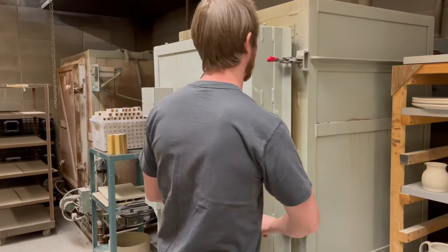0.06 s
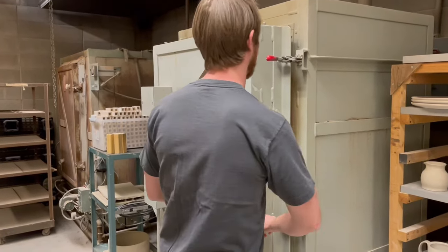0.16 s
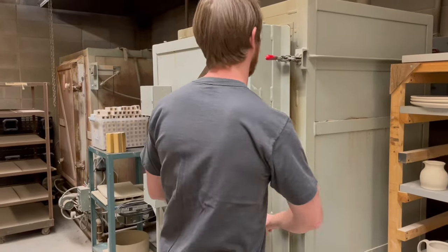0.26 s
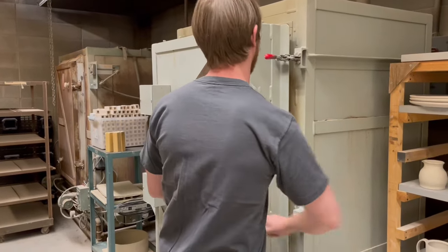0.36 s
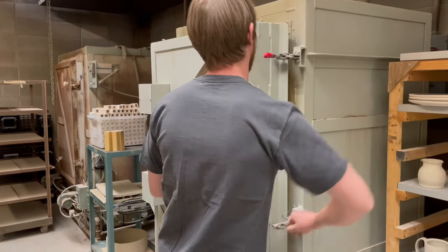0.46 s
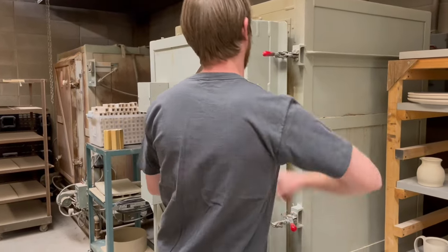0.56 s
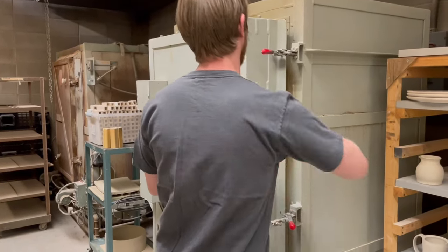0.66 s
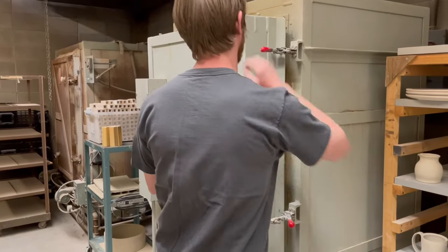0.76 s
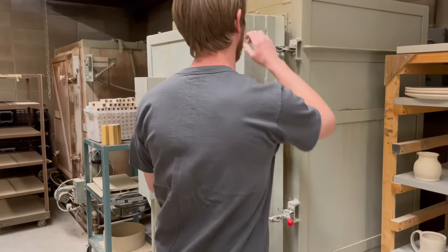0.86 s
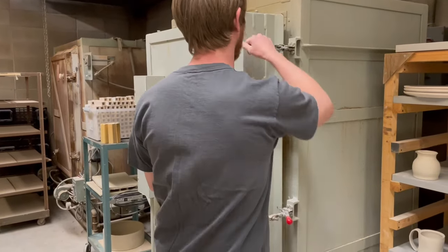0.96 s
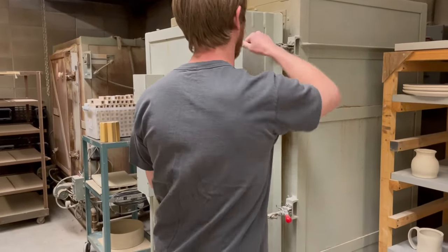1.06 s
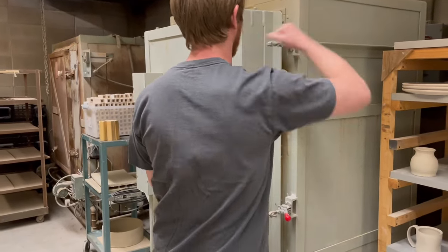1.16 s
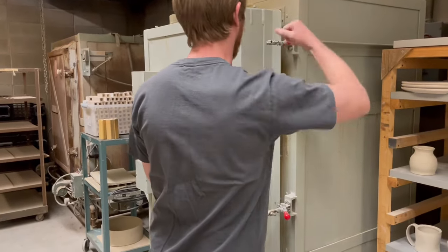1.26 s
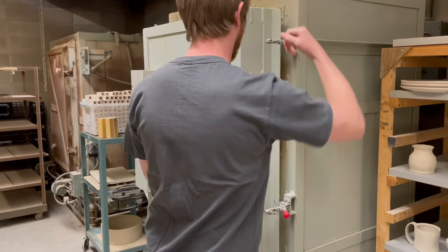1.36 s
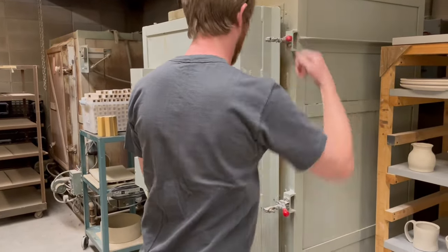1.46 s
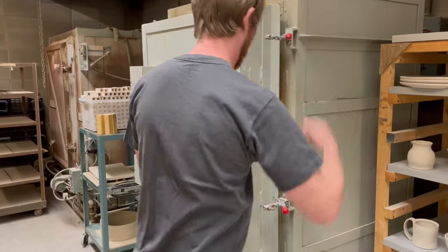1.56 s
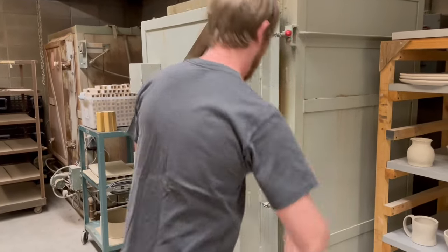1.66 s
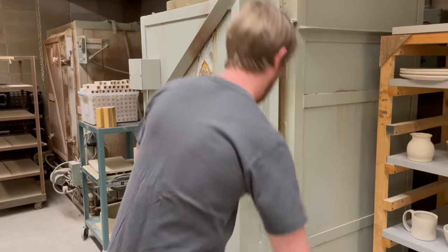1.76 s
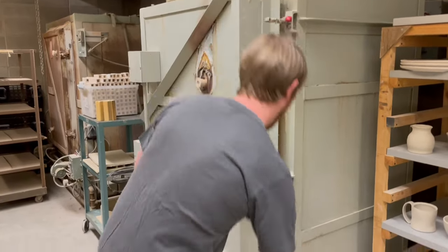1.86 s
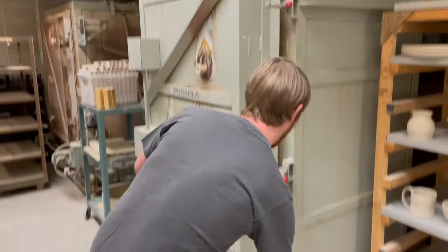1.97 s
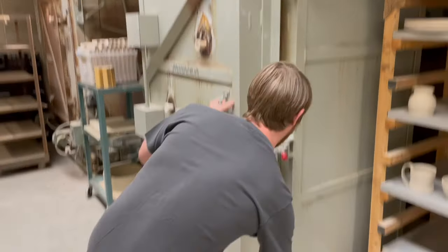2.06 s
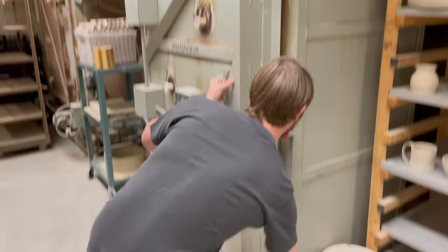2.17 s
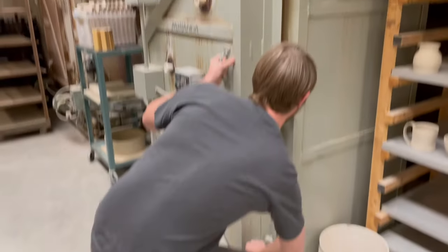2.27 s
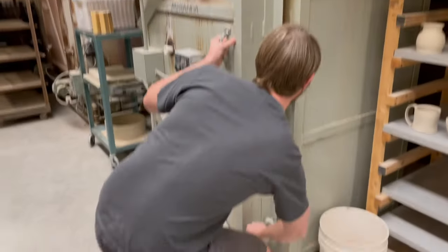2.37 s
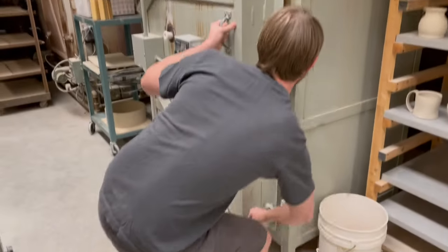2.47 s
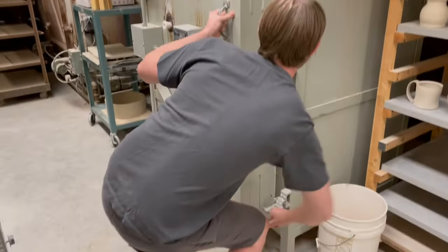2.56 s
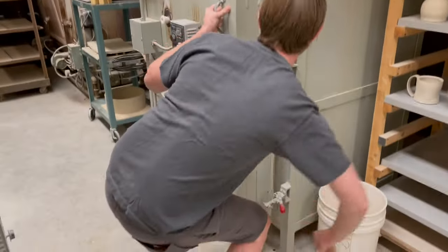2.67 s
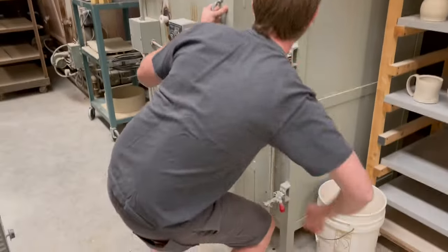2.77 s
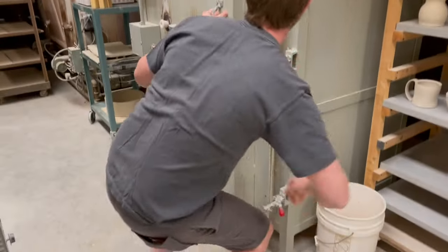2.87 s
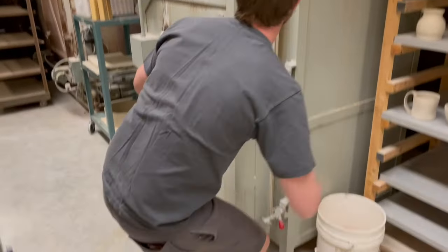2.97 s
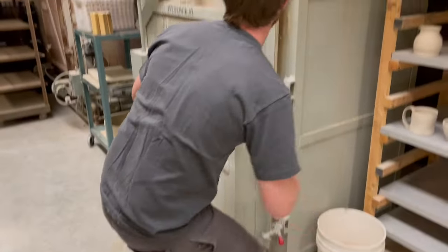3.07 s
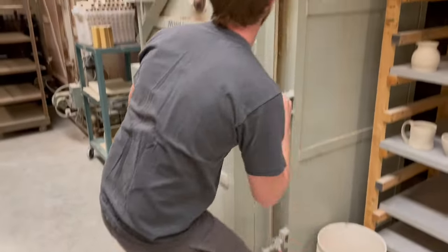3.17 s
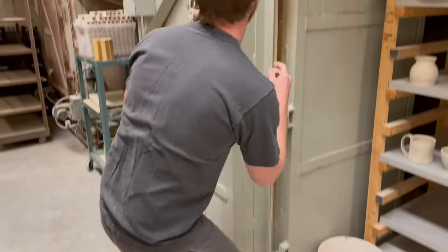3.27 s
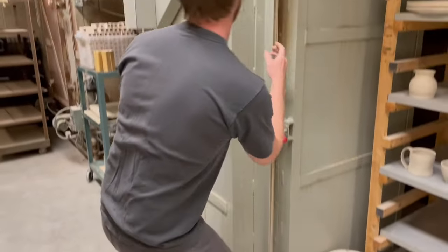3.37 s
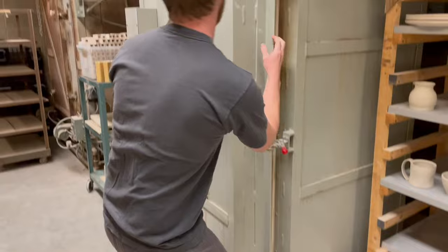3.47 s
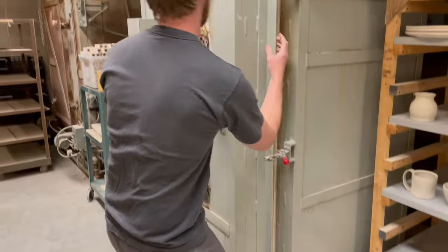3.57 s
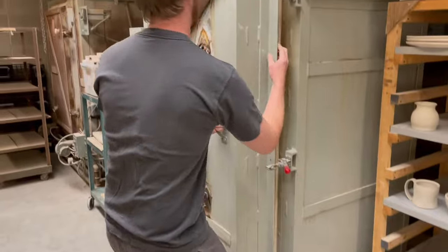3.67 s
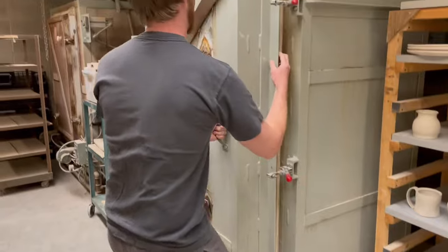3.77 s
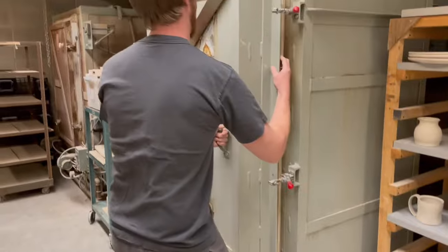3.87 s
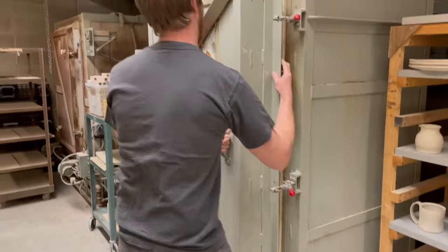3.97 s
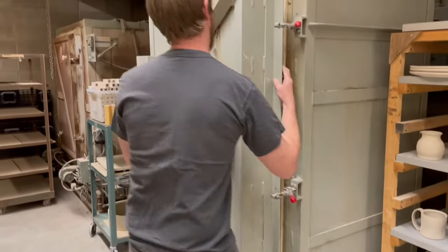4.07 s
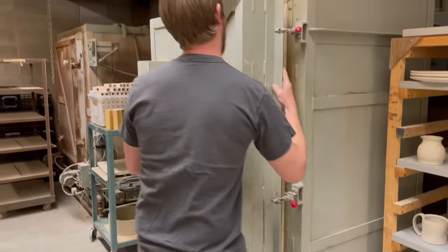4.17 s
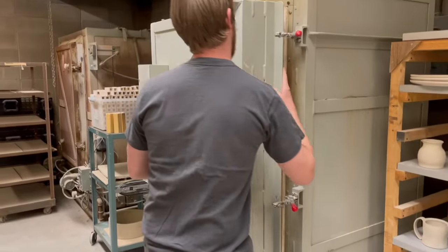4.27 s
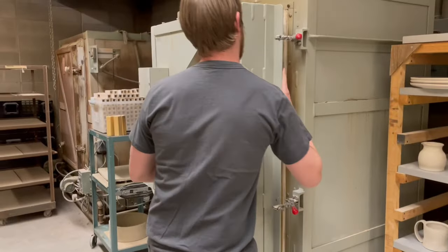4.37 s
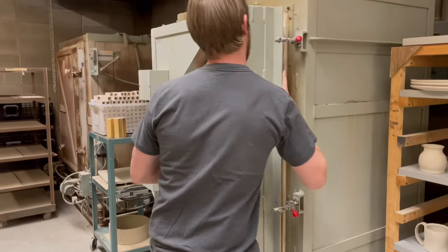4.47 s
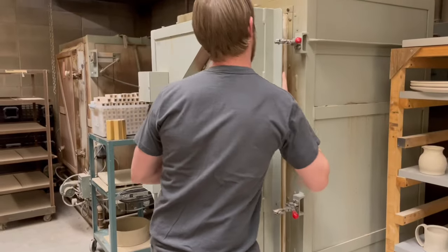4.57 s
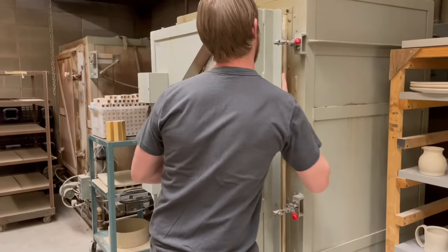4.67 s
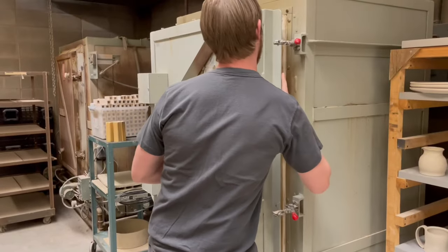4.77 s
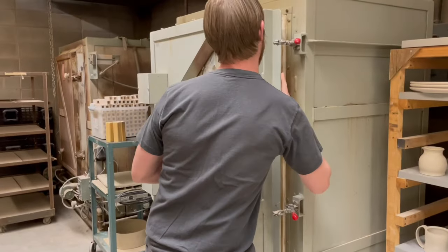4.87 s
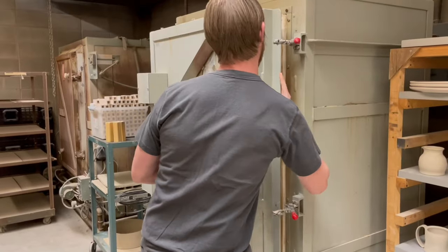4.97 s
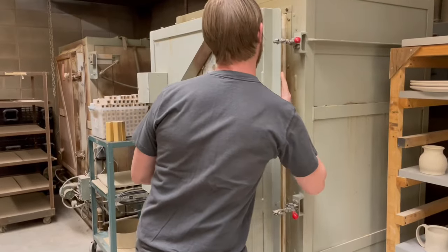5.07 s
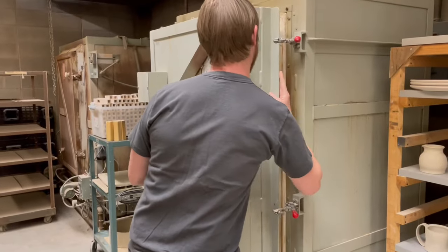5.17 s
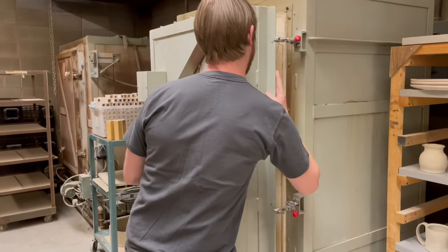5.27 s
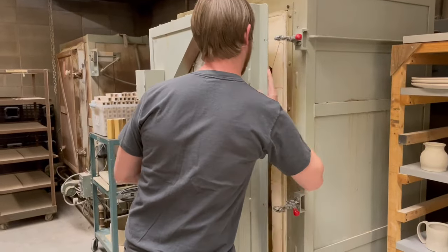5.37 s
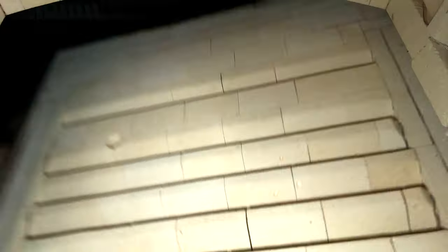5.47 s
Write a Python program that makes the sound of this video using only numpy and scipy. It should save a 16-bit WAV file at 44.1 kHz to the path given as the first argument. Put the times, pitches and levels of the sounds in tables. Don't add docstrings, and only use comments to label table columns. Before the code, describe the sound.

Three steel latches on a heavy metal door slam open with booming, echoing clacks, then the door ticks, scrapes and creaks as it is pulled.

```python
import sys
import numpy as np
from scipy import signal
from scipy.fft import rfft, irfft, next_fast_len
from scipy.io import wavfile
from scipy.ndimage import uniform_filter1d, map_coordinates

SR = 44100
rng = np.random.default_rng(int(sys.argv[2]) if len(sys.argv) > 2 else 0)


def waveform_to_disk(signal):
    frames = np.transpose(np.atleast_2d(signal))
    scaled = np.clip(frames, -1, 1) * 32767
    samples = np.round(scaled).astype(np.int16)
    wavfile.write(sys.argv[1], SR, samples)


def level_to_linear(level):
    exponent = np.asarray(level, float) / 20
    return 10 ** exponent


N = 243415

# time in seconds, half width in seconds.
JOINS = [
    (0.276, 0.034),
    (2.483, 0.0033),
    (3.211, .015),
]
# start in seconds, tick level in dB, push rise in seconds,
# drag level in dB, dull part of the drag in dB.
LIFTS = [
    (0.3293, -46, 0.0021, -58, 10),
    (1.0807, -63, 0.0082, -62, -2),
    (2.5, -54, 0.018, -59, 3),
]
# start in seconds, crack peak in dB, boom peak in dB, room level in dB,
# push rise in seconds.
SLAMS = [
    (0.393, -28, -12, -30, .004),
    (1.1611, -24, -15.5, -32.5, .0058),
    (2.5656, -27.5, -11.5, -30.5, .0058),
]


def unit(x):
    return x / np.sqrt(np.mean(x ** 2) + 1e-20)


def along(points, hz):
    f, v = np.transpose(points)
    return np.interp(np.log(hz + 1), np.log(f + 1), v)


def seconds():
    return np.arange(N) / SR


def filtered(x, response):
    n = x.shape[-1]
    m = next_fast_len(n + 8192)
    return irfft(rfft(x, m) * response(np.fft.rfftfreq(m, 1 / SR)), m)[..., :n]


def resonances(peaks):
    def response(f):
        total = 0
        for k, (centre, width, db) in enumerate(peaks):
            peak = 1j * f * width / (centre * centre - f * f + 1j * f * width)
            total = total + (-1) ** k * level_to_linear(db) * peak
        return total
    return response


def thin(low_hz, tilt_db):
    return lambda f: (1j * f / (low_hz + 1j * f)) ** 4 * (1 + 1j * f / low_hz) ** (tilt_db / 6)


def noise(spectrum):
    return unit(filtered(rng.standard_normal((2, N)), lambda hz: level_to_linear(along(spectrum, hz))))


def wobble(rate):
    knots = rng.standard_normal(int(N * rate / SR) + 4)
    return map_coordinates(knots, [np.arange(N) * rate / SR])


def swell(s, db, rise, fall, hold=0, sag_db=0):
    t = seconds() - s
    climb = 20 * np.minimum(t, 0) / rise
    sag = sag_db * np.clip(t, 0, hold)
    drop = 20 * np.maximum(t - hold, 0) / fall
    return level_to_linear(db + climb - sag - drop)


def add(pair, s, sound, colour, room_db, rise, size=SR // 2):
    # Hz, seconds for the echo to fall by 60 dB.
    room = [(60, 1.1), (200, 0.67), (1000, 0.67), (3000, 0.49), (6000, .35), (12000, 0.23)]
    hz, t, z = signal.stft(rng.standard_normal((2, size)), SR, nperseg=256)
    t60 = along(room, hz)[:, None]
    near_walls = level_to_linear(-60 * t / t60)
    far_hall = level_to_linear(-25.5 - 60 * t / (2.5 * t60))
    decay = np.hypot(near_walls, far_hall)
    patches = unit(uniform_filter1d(rng.standard_normal(z.shape[1:]), size=5))
    tail = signal.istft(z * decay * level_to_linear(2.0 * patches), SR, nperseg=256)[1]
    build_up = (1 - np.exp(-np.arange(tail.shape[1]) / SR / rise)) ** 2
    tail = filtered(tail, colour) * build_up
    heard = level_to_linear(room_db) * tail / np.sqrt(np.mean(tail[:, :SR // 10] ** 2))
    heard[:, :len(sound)] += [1.175 * sound, 0.38 * signal.hilbert(sound).imag]
    at = pair[:, round(s * SR):]
    at[:, :heard.shape[1]] += heard[:, :at.shape[1]]


def room_air():
    # start in seconds, level in dB, drift in dB per second.
    air = [
        (0, -58.5, -3),
        (0.276, -64, -1.5),
        (2.483, -66.5, -.3),
        (3.211, -68, -1.3),
    ]
    # Hz, dB per Hz. First the hum, then the dying echo.
    hum_colour = [(15, -22), (30, -2), (60, 2), (120, -1), (300, -10.5), (600, -15), (850, -20),
                  (1400, -25), (2500, -47), (5000, -41.5), (10000, -44.5), (15800, -42.5)]
    echo_colour = [(88, -28), (150, -2), (325, -10), (391, -12.5), (899, -9), (1570, -19.5), (6000, -41.5),
                   (7800, -55), (13200, -120)]
    t = seconds()
    take = np.searchsorted(np.transpose(JOINS)[0], t)
    s, db, drift_db = np.array(air)[take].T
    hum = level_to_linear(db + drift_db * (t - s) + wobble(3.1)) * noise(hum_colour)
    echo = level_to_linear(-57 - 55 * t) * (t < JOINS[0][0]) * noise(echo_colour)
    return hum + echo


def scuffs():
    # Hz, dB per Hz.
    rub = [(300, -40), (900, -1.5), (2200, -3), (4000, -3), (6500, -8), (9000, -7.5), (12000, -21),
           (15800, -17)]
    # peak time in seconds, level in dB, seconds to rise 20 dB, seconds to fall 20 dB, dull part in dB.
    rubbing = [(1.062, -75, .01, .15, -15), (1.85, -83, .6, 1, -2), (2.3, -84, 1.2, .04, -20),
               (2.5, -68, .03, .08, -15), (3.24, -85, .04, .8, -3), (3.4, -76, .2, .2, 2),
               (3.9, -84, .5, .6, 5), (4.17, -72, .11, .23, 7), (4.5, -77, .2, .08, -3),
               (4.75, -75, .1, .3, -3), (4.88, -64, .17, .4, -15), (5.03, -63.5, .3, .17, -15),
               (5.52, -84, .4, .3, 9)]
    strokes = [(swell(s, db, rise, fall), dull_db) for s, db, rise, fall, dull_db in rubbing]
    for (s, _, _, db, dull_db), (end, *_) in zip(LIFTS, SLAMS):
        drag = swell(end, db, 20 * (end - s) / 14, .008) * (seconds() > s)
        strokes.append((drag, dull_db))
    bright_gain = np.sqrt(sum(gain ** 2 for gain, _ in strokes))
    dull_gain = np.sqrt(sum((gain * level_to_linear(dull_db)) ** 2 for gain, dull_db in strokes))
    grit = level_to_linear(wobble(27) + 2.3 * wobble(270))
    dull = unit(filtered(noise(rub), lambda f: 1 / (1 + (f / 1500) ** 2)))
    bright = unit(filtered(noise(rub), lambda f: f ** 2 / (f ** 2 + 2100 ** 2)))
    return grit * (bright_gain * bright + dull_gain * dull)


def squeaks():
    # time of full level in seconds, level in dB, seconds to rise 20 dB, seconds held, seconds to fall
    # 20 dB.
    grinds = [
        (1.57, -77, .1, .11, .14),
        (1.57, -64, .26, .19, .16),
        (5.275, -71, .13, .008, .013),
        (5.284, -59, .004, .102, .002),
        (5.278, -61, .012, .006, .04),
        (5.18, -74, .03, .1, .02),
    ]
    # Hz, width in Hz, dB.
    pivot = [(1890, 71, -4), (3800, 110, 1), (5700, 110, -9.5), (6900, 290, -11)]
    lever = [(300, 150, 2), (850, 140, 1), (1300, 130, 2), (2350, 340, -1.5), (3340, 600, -7),
             (4860, 1500, -16)]
    pin = [(3650, 47, -5), (5060, 60, -10), (6130, 60, -4)]
    hinge = [(675, 100, 7), (885, 90, 9), (1200, 120, -6), (1800, 200, -8), (2150, 120, -1.5),
             (3400, 900, -21), (4900, 700, -12), (5750, 690, -11)]
    grip = [(5350, 300, -3), (5850, 400, 0)]
    moan = [(720, 60, 0)]
    total = 0
    for (s, db, rise, hold, fall), peaks in zip(grinds, [pivot, lever, pin, hinge, grip, moan]):
        slips = rng.standard_normal((2, N)) * level_to_linear(2 * wobble(220))
        ringing = filtered(slips, resonances(peaks))
        wider = [(hz, 3 * width, 0) for hz, width, _ in peaks]
        squeak = unit(filtered(ringing, resonances(wider)))
        total = total + swell(s, db, rise, fall, hold, sag_db=45) * squeak
    return total


def scrapes():
    # start in seconds, level in dB, rise in seconds, lowest Hz, tilt in dB per octave.
    seal_scrapes = [(2.264, -74, 0.0037, 2200, -17), (2.876, -68, 0.0034, 4000, -32),
                    (3.598, -73, 0.0035, 1950, -7.5), (3.293, -67, 0.011, 1147, -3),
                    (3.331, -62, 0.0053, 1170, -1.5), (3.415, -60, 0.012, 570, -5.5),
                    (3.694, -46.5, 0.015, 740, -3), (3.899, -74, 0.0188, 2950, 7.5),
                    (4.19, -58.5, 0.02, 940, -2.5), (4.45, -75, 0.011, 1980, -1.5),
                    (5.393, -57, 0.0049, 1790, -14)]
    pair, t = np.zeros((2, N)), np.arange(SR // 5) / SR
    for s, db, rise, low_hz, tilt_db in seal_scrapes:
        colour = thin(low_hz, tilt_db)
        grit = rng.standard_normal(len(t)) * level_to_linear(6.8 * rng.standard_normal(len(t)))
        shape = (t / rise * np.exp(1 - t / rise)) ** 1.3
        scrape = unit(filtered(grit, colour)) * shape
        add(pair, s, level_to_linear(db) * scrape, colour, db - 8, rise)
    return pair


def ticks():
    # start in seconds, peak in dB, strongest Hz, room level in dB.
    frame_ticks = [(2.263, -55, 2883, -3), (3.2261, -67, 2460, 11), (3.3384, -47, 1840, 2),
                   (3.6026, -63, 2440, 7), (3.7156, -42, 1985, -0.5), (4.0178, -62, 2400, 6.5),
                   (4.1042, -35, 3000, 8.5), (4.4371, -57, 2030, 6), (4.4599, -52, 3800, -5.5),
                   (4.5376, -49.5, 4120, 1), (4.9192, -41, 4100, 5), (4.9246, -39, 4400, 9),
                   (5.0519, -32.5, 2900, 4), (5.388, -39, 2600, -6), (3.418, -53, 1960, 0),
                   (3.7042, -49, 3000, 0)]
    seal_ticks = [(0.6549, -58, 4100, 7), (0.7087, -74.5, 4220, 0), (0.7337, -74, 4000, 0.5),
                  (2.1081, -62.5, 6640, 3), (2.1791, -72.5, 6870, -0.5), (2.2342, -64.5, 4170, 1),
                  (2.8239, -67, 1410, 0), (2.9994, -75.5, 4390, -0.5), (4.1643, -50, 5860, -2.5),
                  (4.3946, -56, 6000, -2.5), (4.4124, -60, 5400, 2), (4.4593, -48.5, 4120, -2),
                  (4.4922, -62, 4410, 0), (4.534, -53.5, 4050, -2.5), (4.6751, -66, 2400, 11),
                  (4.7666, -47.5, 5920, 1.5), (4.8204, -48.5, 4060, 0), (4.8512, -42.5, 2780, 5),
                  (4.8674, -44.5, 2780, -2), (4.8945, -41.5, 2693, 2.5), (4.9685, -41.5, 2990, 4.5),
                  (5.0103, -49, 4970, 4), (5.1068, -48, 4300, -8), (5.1591, -46.5, 5910, -5.5),
                  (5.2519, -53, 6070, 5), (5.4024, -49, 3730, -1.5), (2.297, -64, 9000, -3),
                  (4.8017, -56, 3070, 2), (4.933, -44, 3500, -3), (4.943, -43, 3500, -4)]
    pair, t = np.zeros((2, N)), np.arange(SR // 20) / SR
    for rows, tilt_db in [(frame_ticks, -9.5), (seal_ticks, -3.5)]:
        for s, db, hz, room_db in rows:
            burst = 0.13 * rng.standard_normal(len(t)) * np.exp(-t / 0.0021)
            burst[0] = 1
            snap = filtered(burst, thin(.5 * hz, tilt_db))
            snap = level_to_linear(db + 2.5) * snap / np.abs(snap).max()
            add(pair, s + 0.00037, snap, thin(0.71 * hz, tilt_db), db + room_db - 32.5, rise=.002)
    return pair


def contacts():
    for which, (lift, slam) in enumerate(zip(LIFTS, SLAMS)):
        s, db, rise, *_ = lift
        yield s, db, db + 12, rise, db + 1, which
        s, crack_db, boom_db, room_db, rise = slam
        yield s, crack_db, boom_db, rise, room_db, which


def latches():
    # Hz, width in Hz, dB.
    panels = [
        [(253, 45, 0), (705, 47, -14), (850, 50, -17), (1154, 14, -24), (1334, 25, -18), (1850, 47, -13.5),
         (2440, 10, -30.5)],
        [(268.7, 44, 4), (370, 50, -1), (560, 90, -5), (830, 60, -2), (1050, 90, -8), (1530, 82, -1),
         (1815, 25, -1), (2360, 160, -9.5)],
        [(189.3, 43, -2), (670, 66, -6), (900, 90, -6.5), (1148, 65, -12), (1338, 36, -9.5), (1670, 45, -19.5),
         (2440, 43, -32)],
    ]
    # Hz, dB per Hz.
    shells = [
        [(30, -10.5), (70, -17), (130, -4), (220, 0), (420, -10.5), (800, -11), (1700, -18.5), (3500, -27.5),
         (7000, -29.5), (11500, -36.5), (15500, -45.5)],
        [(30, -19.5), (70, -6), (130, -3.5), (220, -0.5), (420, -1.5), (800, -6.5), (1700, -4), (3500, -11.5),
         (7000, -20), (11500, -27), (15500, -33)],
        [(30, -16), (70, -8), (130, -3), (220, 2), (420, -5), (800, -6), (1700, -14), (3500, -23), (7000, -29),
         (11500, -29), (15500, -37)],
    ]
    # Hz, dB per Hz.
    crack_colour = [(300, -25.5), (700, 1), (1200, -11.5), (3000, -9), (6000, -11.5), (9000, -12),
                    (12000, -19), (15800, -22)]
    # Hz, dB, seconds to fall by 60 dB (cut to 0.12 at most).
    steel = [(1468, -5.5, 0.31), (1695, 2.5, 1.3), (1823, -12, 0.75), (2724, -15.5, 0.49),
             (2795, -27.5, 0.32), (3480, -11, 5.0), (4199, -17.5, 0.51), (4520, -12, 0.087)]
    pair, t = np.zeros((2, N)), np.arange(SR // 4) / SR
    for s, crack_db, boom_db, rise, room_db, which in contacts():
        panel, shell = panels[int(which)], shells[int(which)]
        burst = rng.standard_normal((2, len(t)))
        crack = unit(filtered(burst[0], lambda hz: level_to_linear(along(crack_colour, hz))))
        crack = crack * (0.76 * level_to_linear(-60 * t / 0.074) + 0.81 * level_to_linear(-60 * t / 0.019))
        crack = crack * (1 - np.exp(-t / 0.00087))
        ring = 0
        for hz, db, t60 in steel:
            level = level_to_linear(db + rng.normal(0, 2) - 60 * t / min(t60, .12))
            ring = ring + level * np.sin(2 * np.pi * hz * t)

        push = burst[1] * t / rise * np.exp(1 - t / rise)
        boom = filtered(push, resonances(panel)) * level_to_linear(-60 * t / 0.22)
        thump = np.sin(2 * np.pi * panel[0][0] * t) * (t / rise) ** 2 * np.exp(2 - 1.6 * t / rise)
        boom = boom / np.abs(boom).max() + 0.15 * thump
        sound = level_to_linear(crack_db - 5) * (crack + .2 * ring) + level_to_linear(boom_db) * boom / np.abs(boom).max()

        lumps = rng.standard_normal(400)
        modes = resonances([(hz, min(width, 70), -1) for hz, width, _ in panel])

        def colour(hz):
            uneven_db = 2.0 * np.interp(hz / 45, np.arange(len(lumps)), lumps)
            return level_to_linear(along(shell, hz) + uneven_db) * (1.0 + np.abs(modes(hz)))

        add(pair, s, sound, colour, room_db, rise=.006, size=SR + SR // 2)
    return pair


def scene():
    # Hz, left-right likeness (1 is identical).
    alike = [(60, .97), (150, .94), (350, .72), (900, .3), (1700, .2), (2500, .5), (4300, .55), (5400, .35),
             (6600, .65), (7800, .88)]
    pair = room_air() + scuffs() + squeaks() + scrapes() + ticks() + latches()

    def weights(hz):
        turn = np.arccos(np.clip(along(alike, hz), -1, 1)) / 2
        return np.array([np.cos(turn), np.sin(turn)])

    shared, apart = filtered(pair, weights)
    return np.array([shared + apart, shared - apart])


def roll_off(x):
    return signal.sosfilt(signal.butter(12, 16550, fs=SR, output="sos"), x)


def record(dry):
    # Hz, radians by which left leads.
    lead_curve = [(0, 0), (1700, .1), (3000, .5), (5200, .7), (6000, -.4), (8200, -3.1), (11400, -6.3),
                  (13300, -7.6), (14100, -9.2), (16500, -9.7)]
    # Hz, left minus right in dB.
    left = [(60, -2.2), (400, -1.6), (1500, -.5), (3500, 1), (5500, 1.5), (7500, 0)]
    # Hz, dB.
    ports = [(9000, 0), (12500, -2), (15700, -3), (15900, -14), (16500, -16)]
    f, lead = np.transpose(lead_curve)
    half = np.array([[.5], [-.5]])

    def microphone(hz):
        level = level_to_linear(half * along(left, hz) + along(ports, hz))
        phase = np.exp(1j * half * np.interp(hz, f, lead))
        return level * phase * (hz < 16550)

    x = filtered(dry, microphone)
    for s, width in JOINS:
        x = x * np.clip(np.abs(seconds() - s) / width, .15, 1)
    return roll_off(x)


dry = scene()
out = record(dry)
waveform_to_disk(out)
```